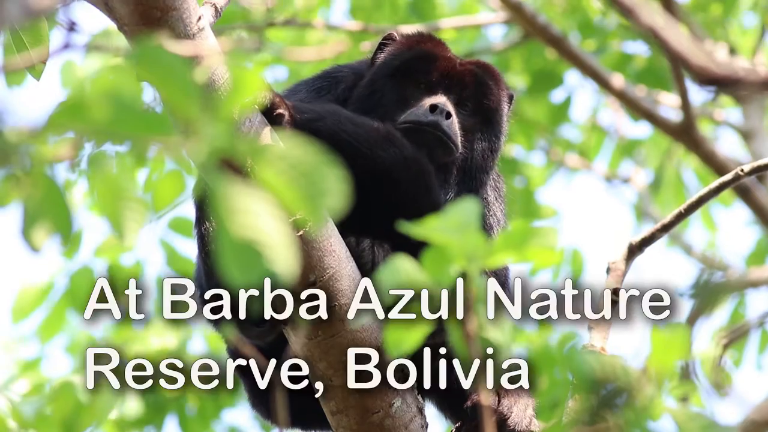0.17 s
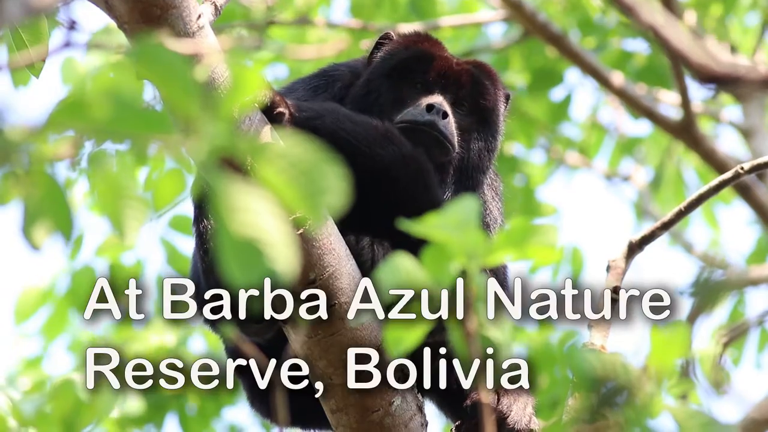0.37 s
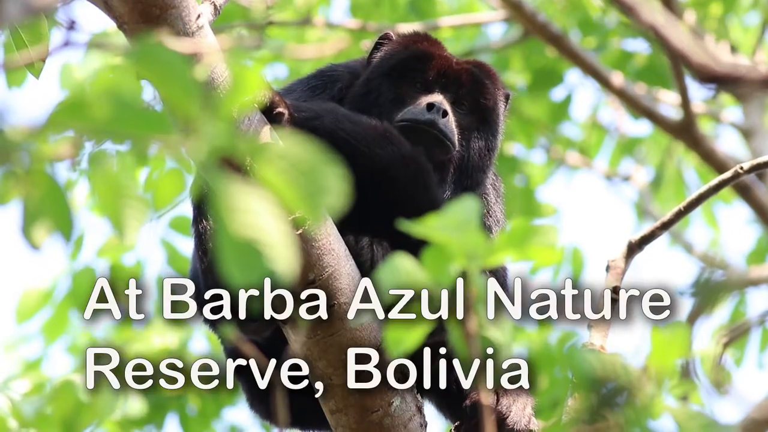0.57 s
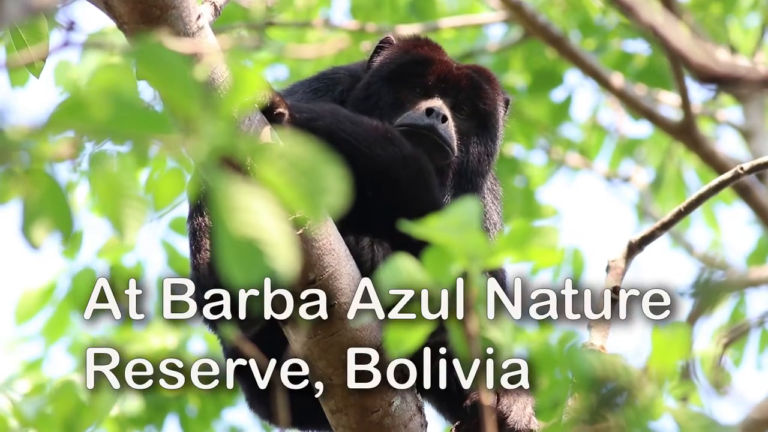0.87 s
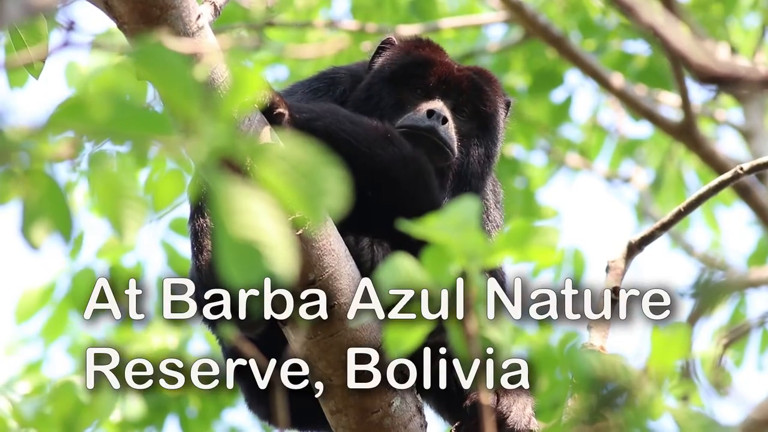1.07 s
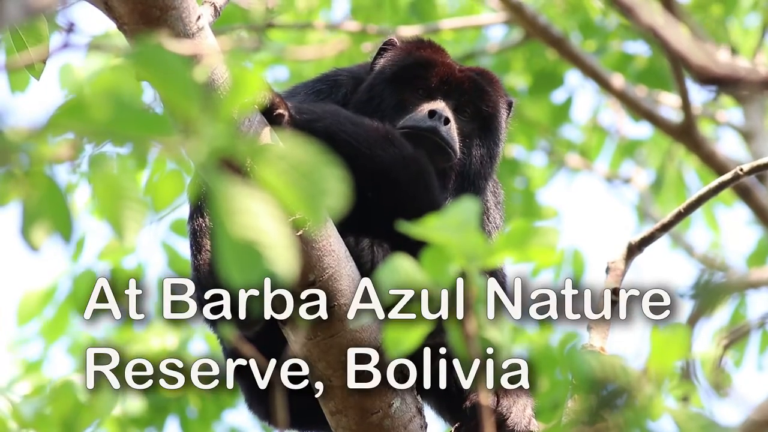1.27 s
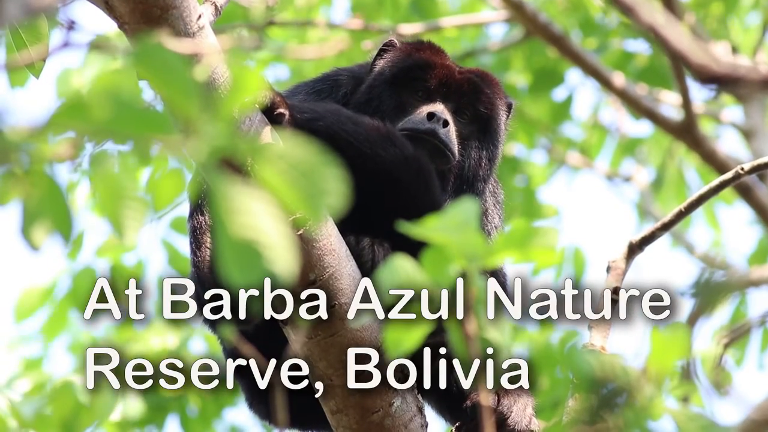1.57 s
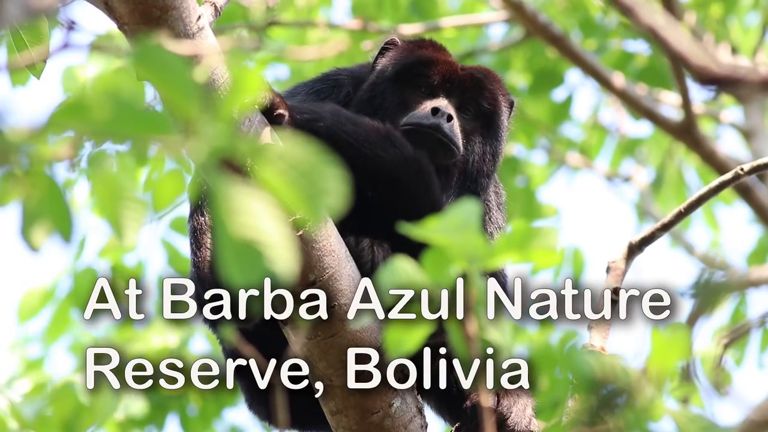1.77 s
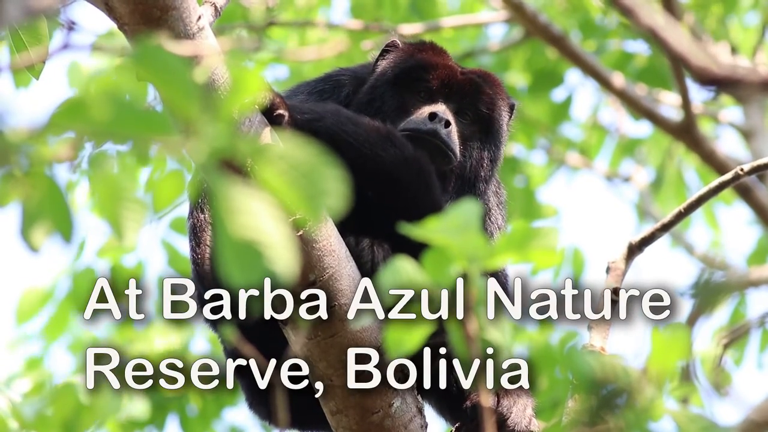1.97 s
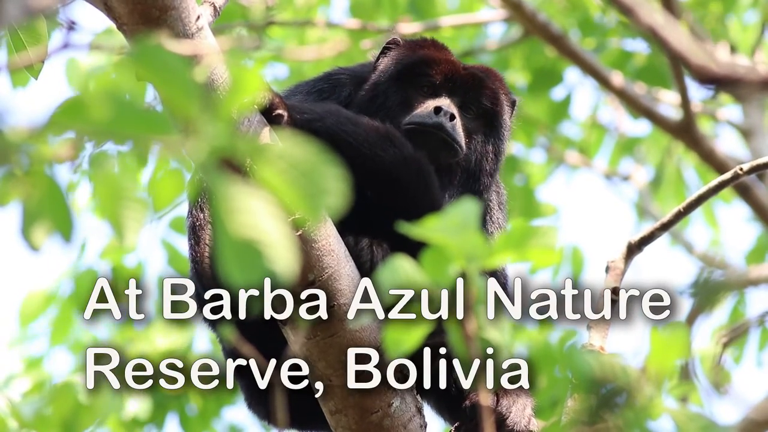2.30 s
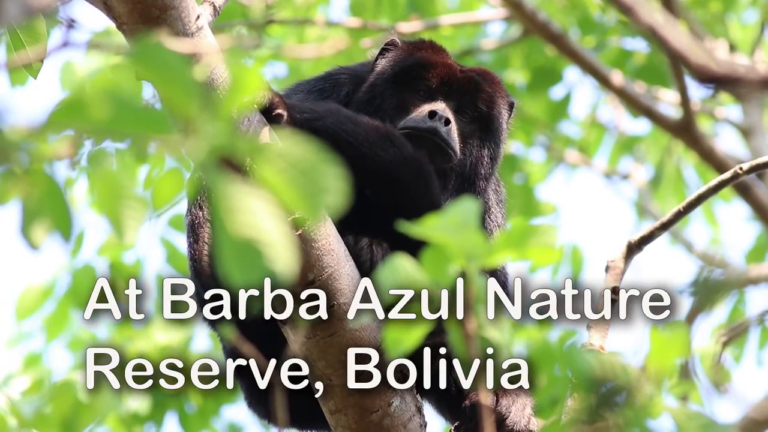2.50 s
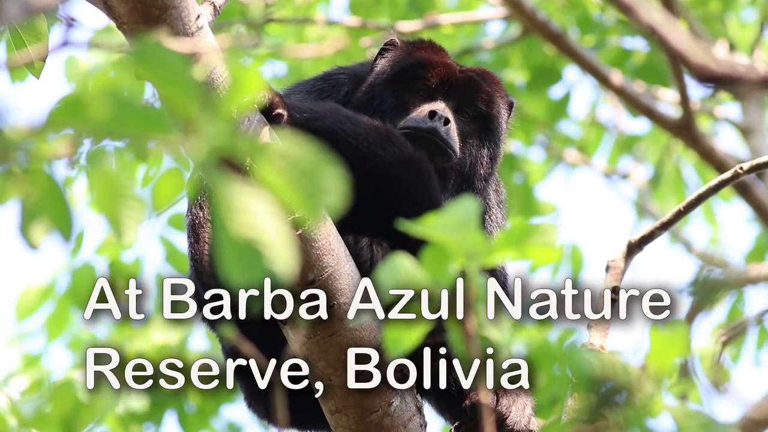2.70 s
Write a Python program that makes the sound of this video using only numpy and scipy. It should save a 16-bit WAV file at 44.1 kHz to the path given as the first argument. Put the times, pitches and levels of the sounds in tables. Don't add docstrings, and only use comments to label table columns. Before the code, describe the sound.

A monkey grunts low and creaky again and again in a tree while wind buffets the microphone

```python
import sys
import numpy as np
from scipy import signal
from scipy.io import wavfile
from scipy.ndimage import uniform_filter1d

SR = 44100
rng = np.random.default_rng(int(sys.argv[2]) if len(sys.argv) > 2 else 0)


def invert_db(level):
    return 10 ** (np.asarray(level, dtype=float) / 20)


def transcribe(u):
    v = np.clip(np.atleast_2d(u).T, -1, 1)
    q = np.round(v * 32767).astype(np.int16)
    wavfile.write(sys.argv[1], SR, q)


N = 125685


def add(mix, start_s, sound):
    part = mix[round(start_s * SR):][:len(sound)]
    part += sound[:len(part)]


def evened(x):
    return x / np.sqrt(np.mean(x ** 2) + 1e-20)


def smooth(x, size, axis=-1):
    return uniform_filter1d(x, size=size, axis=axis)


def read(points, hz):
    f, value = np.transpose(points)
    return np.interp(np.log(hz + 1), np.log(f + 1), value)


def resonate(x, hz, width_hz):
    b, a = signal.iirpeak(hz, hz / width_hz, SR)
    return signal.lfilter(b, a, signal.lfilter(b, a, x))


def field(size, db_of):
    hop = size // 4
    frames, hz = N // hop + 5, np.fft.rfftfreq(size, 1 / SR)
    real, imag, patch = rng.standard_normal((frames, len(hz), 3)).T
    t = np.arange(frames) * hop / SR
    spectra = (real + 1j * imag) * invert_db(db_of(hz[:, None], t[None], patch))
    return signal.istft(spectra, nperseg=size, noverlap=size - hop)[1][:N]


# (frequency [Hz], level [dB], T60 [s])
THROAT_RINGS = [(422, -23.5, 0.039), (590, -29, 0.025), (816, -19.5, 0.026)]


def pulse(db, sac_hz, chance):
    sac_t60_s, push_s, snap_shut_s = 0.042, 0.002, 0.002
    open_from, open_s = 0.8, 0.0014
    t = np.arange(0, .09, 1 / SR)
    push = 1 - np.exp(-(t / push_s) ** 2)
    ring = invert_db(-60 * t / sac_t60_s) * np.sin(2 * np.pi * sac_hz * t + np.pi) * push
    late = np.maximum(t - snap_shut_s, 0)
    opening = late - (1 - open_from) * open_s * (1 - np.exp(-late / open_s))
    for (hz, ring_db, t60_s), c in zip(THROAT_RINGS, chance):
        tone = np.sin(2 * np.pi * hz * (1 + 0.029 * c) * opening)
        ring = ring + invert_db(ring_db + 2.5 * c - 60 * late / t60_s) * tone
    return invert_db(db + 7.5) * ring


# (time [s], level [dB], air-sac pitch [Hz])
KNOCK_EVENTS = [
    (0.1065, -29.5, 200),
    (0.6546, -34.5, 221),
    (1.2163, -27.5, 199),
    (1.834, -30.5, 192),
    (2.358, -33.5, 195),
]


def knocks():
    out = np.zeros(N)
    for s, db, hz in KNOCK_EVENTS:
        add(out, s, pulse(db, hz, rng.standard_normal(len(THROAT_RINGS))))
    return out


# (start [s], first gap [s], gap growth per pulse [ratio])
RUN_EVENTS = [
    (.7198, .028, 1.24),
    (1.2562, .0275, 1.13),
    (1.8857, .025, 1.05),
    (2.4145, .025, 1.13),
]
# (level [dB], fade per pulse [dB])
RUN_EFFORT = [
    (-24.5, -3.5),
    (-24, -5.5),
    (-23, -3),
    (-23.5, -3.5),
]


def runs():
    pulses, sac_hz, sag_ratio, fade_bend = 4, 187.4, 0.97, 1.27
    out = np.zeros(N)
    for (s, gap_s, slowing), (db, fade_db) in zip(RUN_EVENTS, RUN_EFFORT):
        for k in range(pulses):
            chance = rng.standard_normal(len(THROAT_RINGS))
            add(out, s, pulse(db + fade_db * k ** fade_bend, sac_hz * sag_ratio ** k, chance))
            s = s + gap_s * slowing ** k
    return out


# (time [s], level [dB], upper rings [dB], upper pitch [ratio])
SNAP_EVENTS = [(.658, -60, 4.5, 0.99), (.7515, -63, 7.5, .98), (1.2185, -51, -2.5, 1.01),
               (1.259, -49, -4.5, 1.02), (1.2862, -59.5, 3.5, .97), (1.888, -57, -8, 1.0),
               (1.913, -52.5, -6, 1.0), (1.94, -56, -2.5, .99), (2.3604, -54.5, 1, 1),
               (2.4425, -54.5, 3, 0.98), (2.47, -56.5, -7, 1.0)]
# (frequency [Hz], width [Hz], level [dB])
MOUTH_RINGS = [
    (2680, 300, 0),
    (4200, 260, 0),
    (5450, 320, -7),
]


def snaps():
    snap_s, breath, tick = .002, .36, 8.0
    out, t = np.zeros(N), np.arange(0, .03, 1 / SR)
    for s, db, upper_db, upper_ratio in SNAP_EVENTS:
        puff = rng.standard_normal(len(t)) * np.exp(-t / (3 * snap_s))
        drive = breath * puff + tick * (t == 0)
        snap = np.zeros(len(t))
        for k, (hz, width_hz, ring_db) in enumerate(MOUTH_RINGS):
            if k > 0:
                hz, ring_db = hz * upper_ratio, ring_db + upper_db
            snap += invert_db(ring_db) * evened(resonate(drive, hz, width_hz))
        add(out, s, invert_db(db) * snap)
    return out


def monkey():
    voice = knocks() + runs() + snaps()
    t = np.arange(0, .12, 1 / SR)
    scatter = rng.standard_normal(len(t)) * invert_db(-60 * t / 0.05) * np.minimum(t / .006, 1)
    scatter = scatter / np.linalg.norm(scatter)
    return voice + invert_db(-22.5) * signal.oaconvolve(voice, scatter)[:N]


# (time [s], level [dB])
GUST_LEVELS = [(.11, -29.5), (.21, -29), (.31, -31), (.44, -30.5), (.53, -33.5), (.6, -30.5), (.72, -35),
               (.84, -30), (1.02, -41.5), (1.14, -32.5), (1.28, -43.5), (1.62, -42), (1.75, -47),
               (2.02, -39.5), (2.46, -40), (2.58, -31.5), (2.64, -46.5), (2.74, -38.5)]
# (frequency [Hz], level per Hz [dB])
BUFFET_SPECTRUM = [(10, 2.5), (30, 9), (50, -2), (75, -12), (120, -23.5), (200, -38), (350, -52),
                   (2000, -130)]


def wind():
    gust_ref_db, brighten, lump_db = -36, .65, 2.5
    times, levels = np.transpose(GUST_LEVELS)

    def gusty(hz, t, patch):
        octaves = np.clip(np.log2(hz / 36 + 0.011), 0, 2.2)
        excess_db = np.interp(t, times, levels) - gust_ref_db
        return read(BUFFET_SPECTRUM, hz) + brighten * octaves * excess_db

    lumps = evened(smooth(smooth(rng.standard_normal(N), 900), 900))
    x = field(2048, gusty)
    x = x / np.sqrt(smooth(smooth(x ** 2, 4000), 4000) + 1e-12)
    gust_db = np.interp(np.arange(N) / SR, times, levels)
    return x * invert_db(gust_db + lump_db * lumps + 5.5)


# (time [s], level [dB], frequency [Hz])
THUD_EVENTS = [(0.118, -19.5, 44.7), (0.149, -27.5, 60), (0.171, -26, 40), (0.208, -15.5, 41),
               (0.249, -17.5, 44.8), (0.27, -18.5, 38), (0.329, -15.5, 58), (0.366, -12.5, 72.6),
               (.42, -13.5, 51.3), (0.442, -18.5, 65.4), (0.458, -22, 50), (0.603, -11, 46.3),
               (0.621, -17.5, 53.5), (0.804, -23, 45), (0.867, -14, 50), (1.141, -25, 48.7),
               (1.176, -24.5, 39.8), (2.071, -22.5, 45), (2.575, -17.5, 38.3)]


def thuds():
    out = np.zeros(N)
    for s, db, hz in THUD_EVENTS:
        turns = np.arange(-1.5, 1.5, hz / SR)
        push = np.exp(-(turns / 0.34) ** 2) * np.cos(2 * np.pi * turns)
        add(out, s - 1.477 / hz, invert_db(db) * push)
    return out


# (start [s], length [s], level [dB], centre [Hz], width [Hz])
RUSTLE_EVENTS = [(.107, 0.011, -39.5, 570, 150), (.108, 0.011, -48, 1930, 300),
                 (0.169, 0.11, -47, 470, 394), (0.204, 0.11, -49.5, 3330, 4070),
                 (0.601, 0.06, -52.5, 6960, 6000), (0.832, 0.057, -52.5, 3980, 5000),
                 (1.497, 0.045, -44, 2220, 1500), (1.495, 0.046, -50, 4700, 1000),
                 (1.524, .006, -45, 3500, 4000), (1.538, .025, -48.5, 3800, 3000),
                 (2.05, .02, -52.5, 5000, 6000), (2.603, 0.038, -53, 5000, 8000),
                 (2.792, 0.016, -46, 2470, 4000), (2.806, 0.012, -50, 6000, 3000),
                 (2.824, 0.0088, -41, 3970, 6960), (2.832, 0.027, -49.5, 6500, 4000)]


def rustles():
    crackles_per_s = 2400
    out = np.zeros(N)
    for s, length_s, db, hz, width_hz in RUSTLE_EVENTS:
        t = np.arange(0, min(length_s, .085), 1 / SR)
        chance, size, noise = rng.random((3, len(t)))
        noise = noise - .5
        crackles = (chance < crackles_per_s / SR) * -np.log(size + 1e-9) * np.sign(noise)
        brush = evened(resonate(crackles + 0.59 * noise, hz, width_hz))
        add(out, s, invert_db(db) * np.sin(np.pi * (t / length_s) ** 0.39) * brush)
    return out


# (frequency [Hz], level per Hz [dB])
LEAF_SPECTRUM = [(88, 6), (150, -4.5), (213, 1), (308, -3.5), (846, 0), (1740, -5), (2660, -6.5),
                 (7170, -13), (15600, -21.5)]


def leaves():
    def patchy(hz, t, patch):
        return read(LEAF_SPECTRUM, hz) + 0.73 * evened(smooth(smooth(patch, 10, 0), 8, 1))

    return invert_db(-52.5 + 5.5) * evened(field(1024, patchy))


# (start [s], length [s], level [dB], pitch [Hz], throb depth [dB])
BIRD_NOTES = [
    (0.536, .125, -62, 2660, 5.5),
    (1.076, .15, -63.5, 2760, 2.5),
]


def bird():
    throb_hz = 23.5
    out = np.zeros(N)
    for s, length_s, db, hz, throb_db in BIRD_NOTES:
        t = np.arange(0, length_s, 1 / SR)
        throb = -np.cos(2 * np.pi * throb_hz * t)
        swell = np.sin(np.pi * t / length_s) ** .3
        add(out, s, invert_db(db + 9 + throb_db * throb) * swell * np.sin(2 * np.pi * hz * t))
    return out


def scene():
    return np.tile(monkey() + wind() + thuds() + rustles() + leaves() + bird(), (2, 1))


def roll_off(x):
    return signal.sosfilt(signal.butter(12, 16440, fs=SR, output="sos"), x)


INPUT_HISS = [
    [-70.5],
    [-58.5],
]


def record(dry):
    leak_db, bass_cut_hz, edge_hz, start_s = -32.5, 26, 15780, .1058
    left = signal.lfilter(*signal.butter(1, bass_cut_hz, "high", fs=SR), dry[0])
    both = np.array([left, invert_db(leak_db) * dry[1]])
    both = both + invert_db(INPUT_HISS) * rng.standard_normal((2, N))
    gate = np.clip((np.arange(N) / SR - start_s) / 0.0013, 0, 1)
    edge = signal.firwin(401, edge_hz, window=("kaiser", 8), fs=SR)
    return roll_off(signal.oaconvolve(both * gate, edge[None], "same"))


dry = scene()
out = record(dry)
transcribe(out)
```